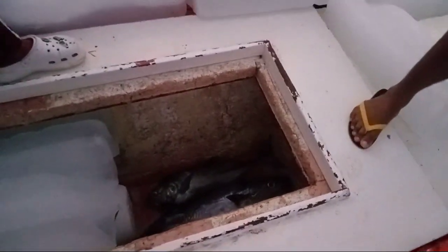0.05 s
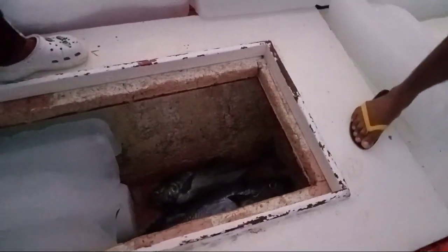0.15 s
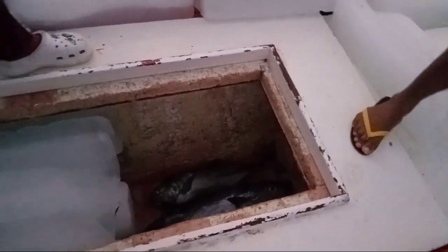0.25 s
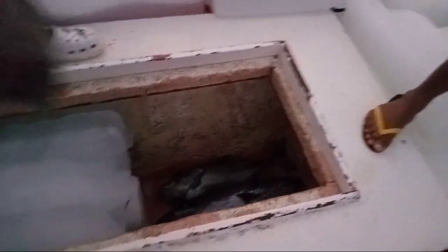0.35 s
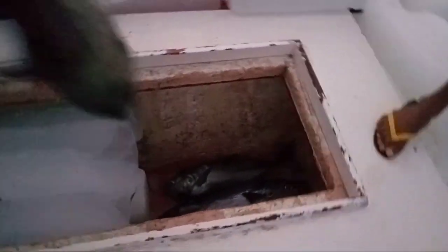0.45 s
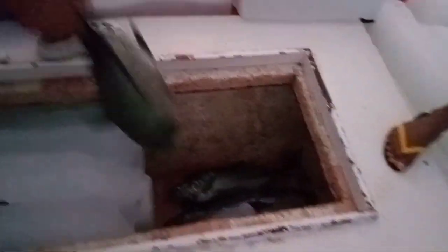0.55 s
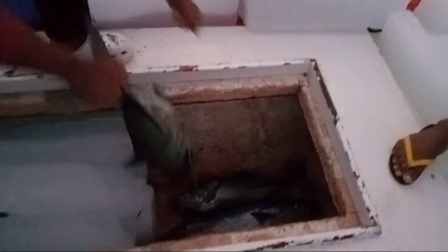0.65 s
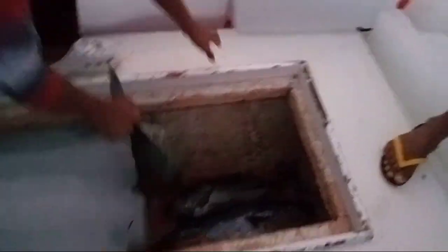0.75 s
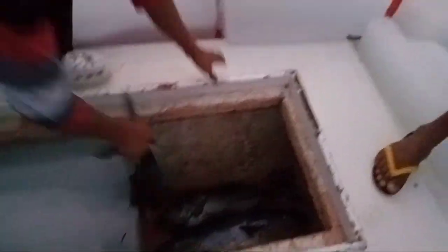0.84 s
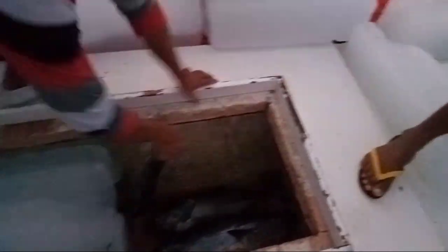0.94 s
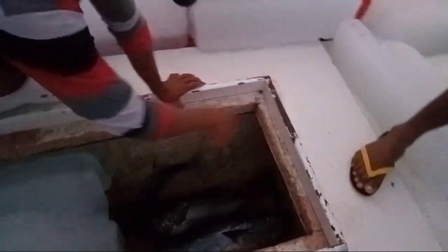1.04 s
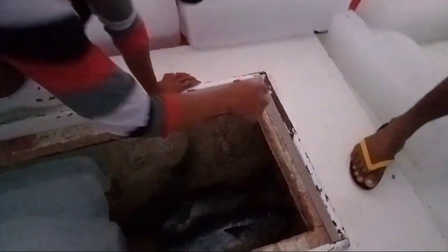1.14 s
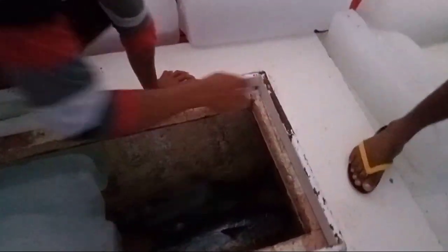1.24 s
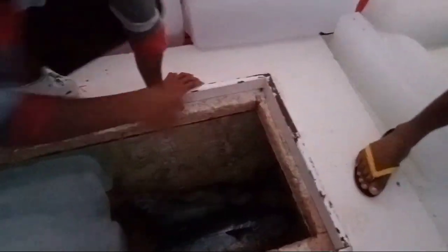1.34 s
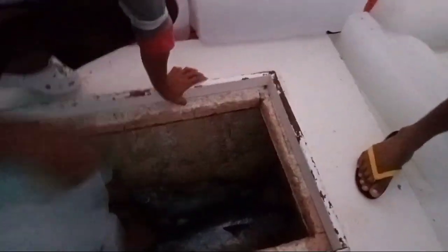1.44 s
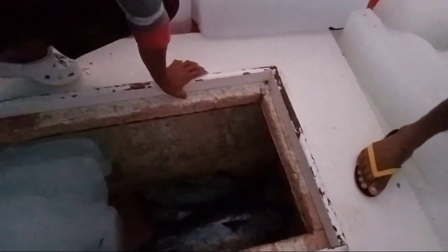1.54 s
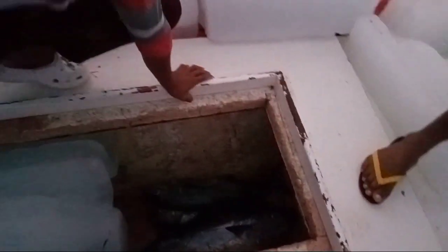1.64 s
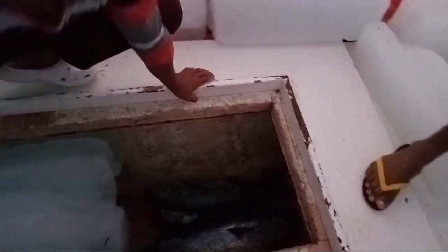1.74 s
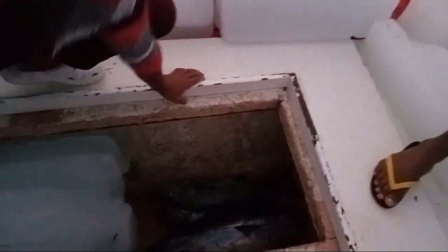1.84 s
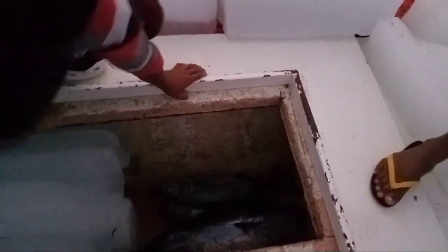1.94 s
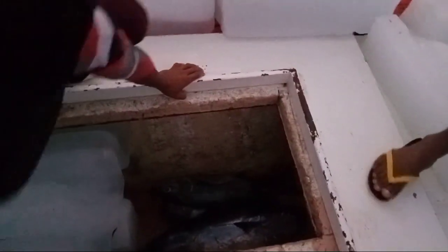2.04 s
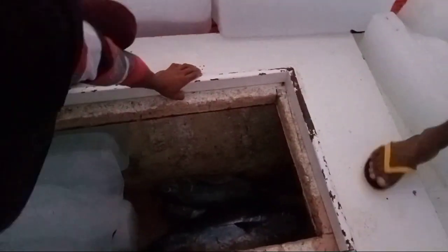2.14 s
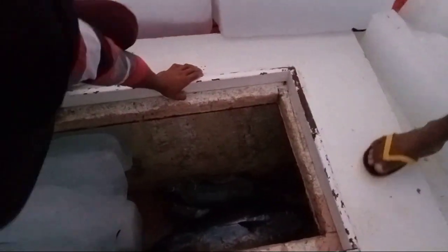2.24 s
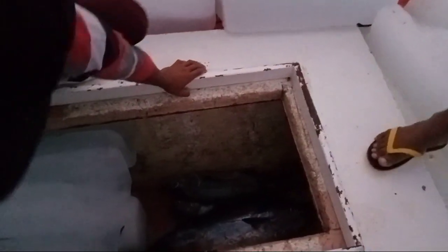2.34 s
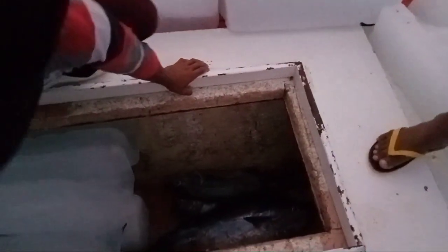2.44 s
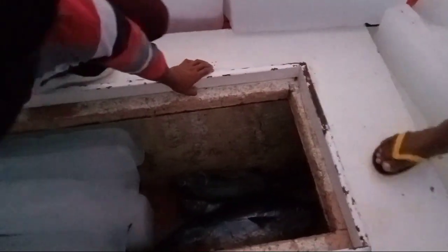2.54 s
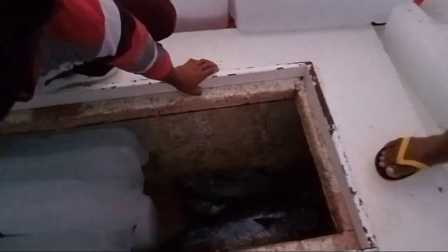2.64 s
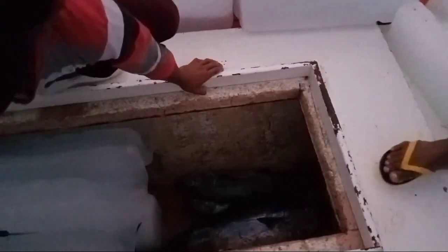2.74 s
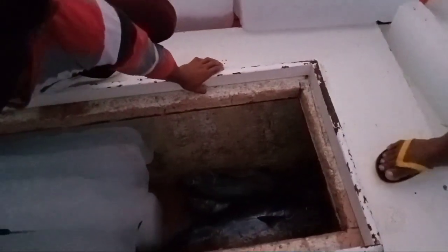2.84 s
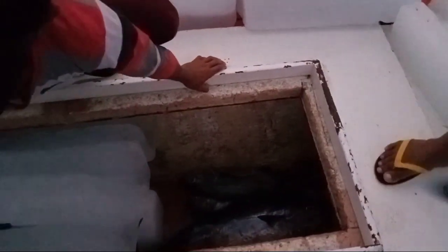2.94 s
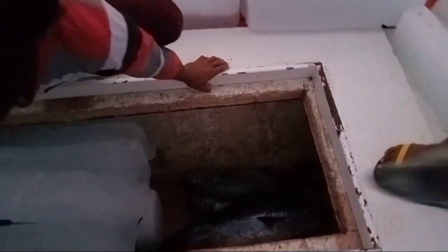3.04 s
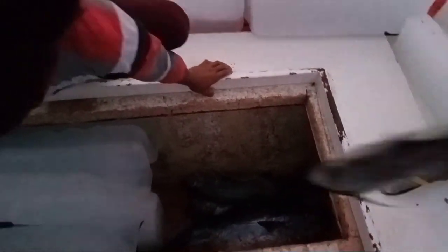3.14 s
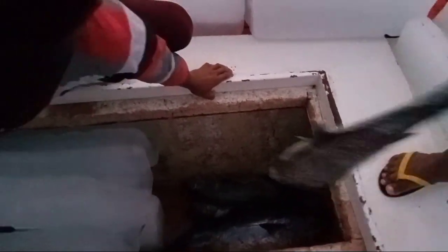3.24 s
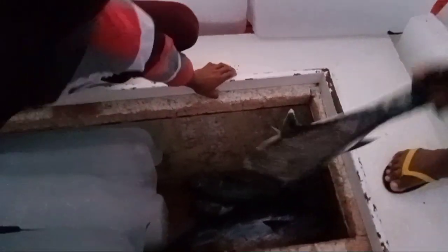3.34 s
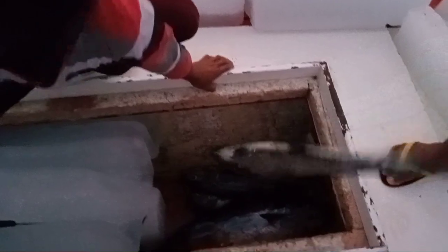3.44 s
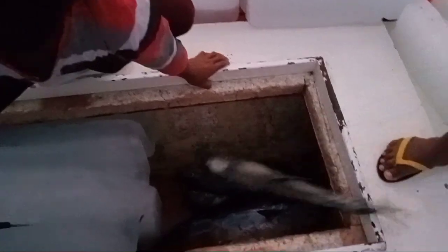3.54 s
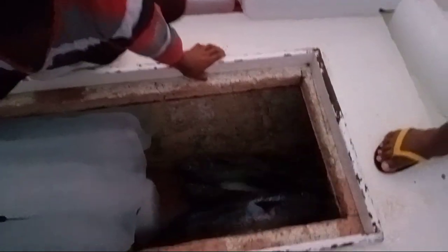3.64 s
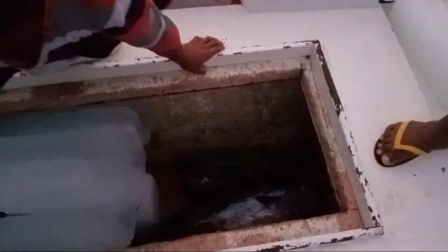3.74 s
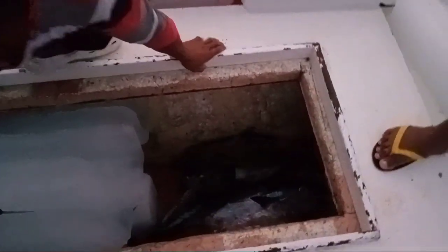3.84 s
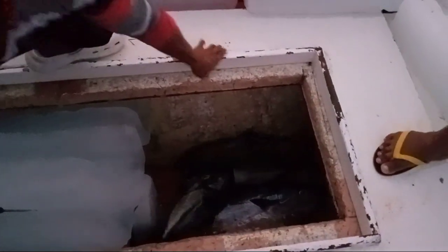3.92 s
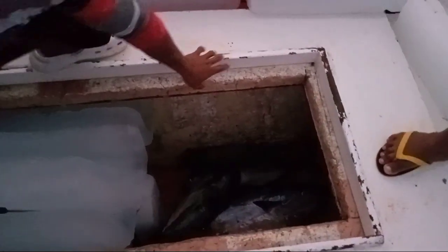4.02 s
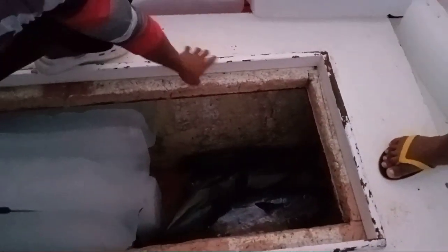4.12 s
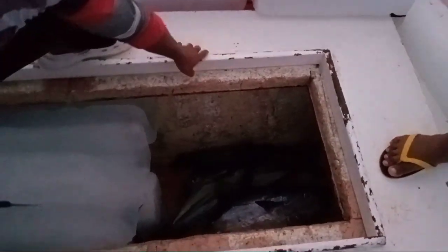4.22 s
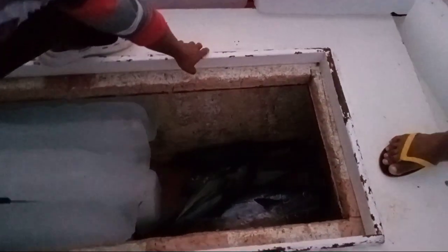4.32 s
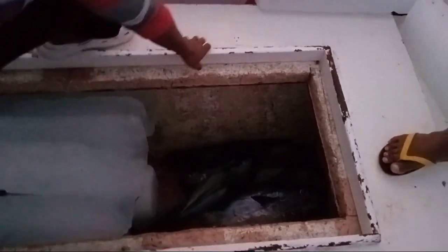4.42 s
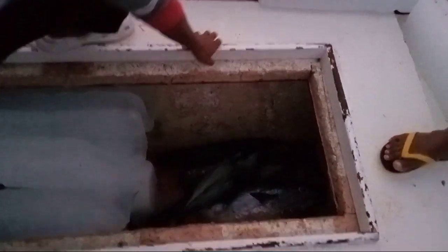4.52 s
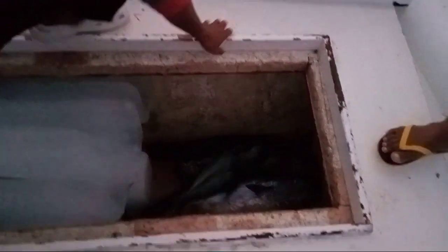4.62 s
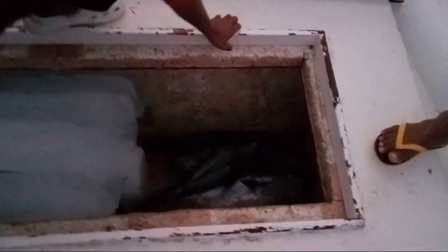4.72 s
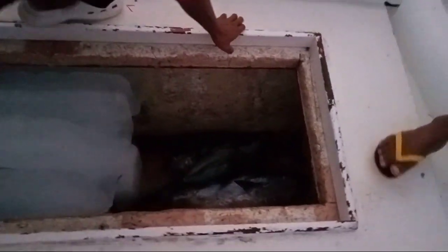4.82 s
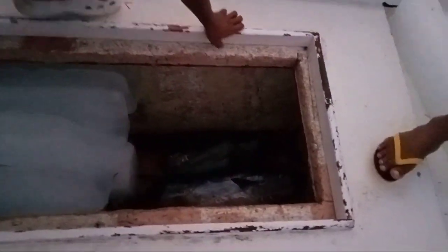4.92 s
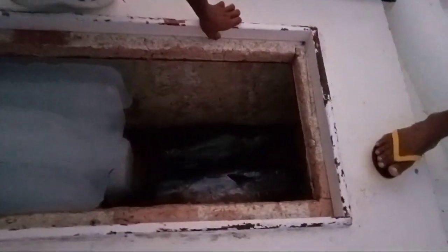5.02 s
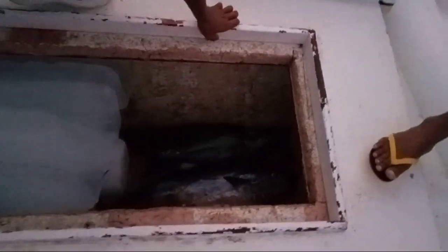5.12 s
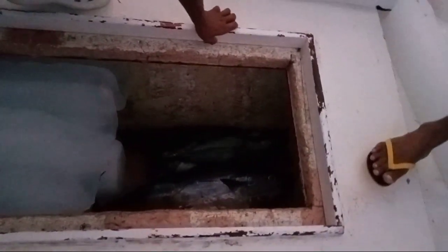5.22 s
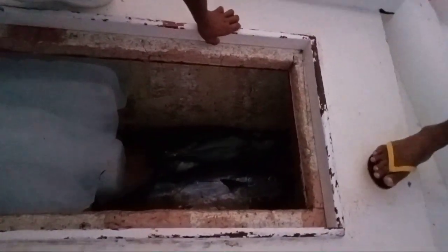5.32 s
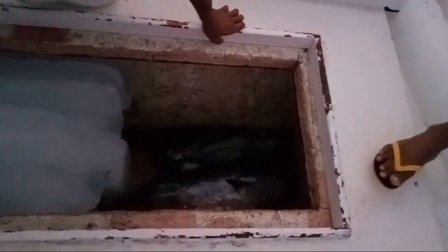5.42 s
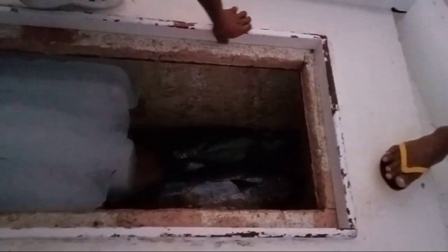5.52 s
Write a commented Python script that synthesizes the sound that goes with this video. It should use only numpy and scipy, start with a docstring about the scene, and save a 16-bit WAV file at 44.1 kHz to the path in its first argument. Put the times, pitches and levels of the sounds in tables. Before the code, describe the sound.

Foamy waves, bubbles and low gusty wind run throughout. Light wet pats lead to a sharp resonant smack on the hold wall near 1.2 seconds, with a quick skid squeak. A quieter middle has muffled bumps; around 3.6 seconds a heavier fish thumps onto other fish and slides. The handheld microphone is close outdoors, with only a short boxy reflection from the hold.

```python
"""On the deck of a small boat, two fish are dropped into a fibreglass ice hold.
The first slaps the wall and squeaks down it; the second thuds onto the catch and slithers over it.
Contacts are crackle, noise and ringing wall modes; thumps and squeaks are gliding sines; slithers are crackle.
Wind is shaped noise in gusts; water is flickering foam with bubbles, spray and gulps under the hull.
A faint, very high whistle arches up and down twice."""
import sys
import numpy as np
from scipy import signal
from scipy.fft import rfft, irfft
from scipy.io import wavfile
from scipy.ndimage import uniform_filter1d, map_coordinates

SR = 44100
rng = np.random.default_rng(int(sys.argv[2]) if len(sys.argv) > 2 else 0)


def wav_out(sig):
    """Save sig, one row per channel (or a flat mono array), as 16-bit PCM at SR to the path in sys.argv[1]."""
    wavfile.write(sys.argv[1], SR, np.round(np.clip(np.atleast_2d(sig).T, -1, 1) * 32767).astype(np.int16))


N = 245637  # length of the scene in samples


def undb(db):
    """Decibels to gain."""
    return 10 ** (np.asarray(db) / 20)


def unit(x):
    """Scale to an rms of one."""
    return x / np.sqrt(np.mean(x ** 2))


def add(track, s, sound):
    """Mix a sound into a track at time s."""
    start = max(int(s * SR), 0)
    track[start:start + len(sound)] += sound[:max(N - start, 0)]


def band(x, low_hz, high_hz, order=2):
    """Band-pass filter."""
    edges = [low_hz, min(high_hz, .45 * SR)]
    return signal.sosfilt(signal.butter(order, edges, "bandpass", fs=SR, output="sos"), x)


def low_pass(x, hz):
    """Low-pass filter without delay, so that subtracting it leaves the matching upper part."""
    return signal.sosfiltfilt(signal.butter(2, hz, fs=SR, output="sos"), x)


def colour(x, points, tilt_db=0, size=4096):
    """Causal filter with the given spectrum, tilted in dB per octave; the result has unit rms."""
    hz, db = np.transpose(points)
    octave = np.log2(np.maximum(np.arange(size // 2 + 1) * SR / size, 1))
    # the tilt acts between 256 and 4096 Hz and stays level outside
    shape_db = np.interp(octave, np.log2(hz), db) + tilt_db * np.clip(octave, 8, 12)
    # folding the cepstrum gives minimum phase
    cepstrum = irfft(np.log(undb(shape_db)))
    cepstrum[1:size // 2] *= 2
    cepstrum[size // 2 + 1:] = 0
    impulse = irfft(np.exp(rfft(cepstrum)))
    return unit(signal.fftconvolve(x, impulse)[:len(x)])


def walk(rate, size=N):
    """Random curve that heads for a new value rate times a second, with an rms of one."""
    steps = rng.standard_normal(size)
    return unit(map_coordinates(steps, [np.arange(size) * rate / SR], order=1))


def crackle(size, rate, spread_db):
    """Dense tiny clicks of unequal strength, rate of them a second on average."""
    chance = rng.random(size) < rate / SR
    strength = undb(spread_db * np.minimum(rng.exponential(size=size), 4))
    return chance * rng.choice([-1, 1], size) * strength


def blow(t, rise, t60):
    """Envelope of a soft contact: it builds up, then dies away."""
    rise = max(rise, 1 / SR)
    build_up = np.sin(np.minimum(t / rise, 1) * np.pi / 2) ** 2
    return build_up * np.exp(-np.log(1000) * np.maximum(t - rise, 0) / t60)


def swell(start, length, attack, t60):
    """Envelope over the whole scene: it rises, holds until the length is over, then dies away."""
    t = np.arange(N) / SR - start
    build_up = np.sin(np.clip(t / attack, 0, 1) * np.pi / 2) ** 2
    return build_up * np.exp(-np.log(1000) * np.maximum(t - length, 0) / t60)


def swells(events, attack, t60):
    """Joint envelope of (start, length, level) events; their powers add."""
    return np.sqrt(sum((undb(db) * swell(start, length, attack, t60)) ** 2 for start, length, db in events))


def bubbles(count=650, cycles=22, glide=0.24, spread_db=7.0):
    """Bubbles of all sizes ring briefly, rising in pitch as they reach the surface."""
    out = np.zeros(N)
    for when, size, strength, life in rng.random((count, 4)):
        hz = 450 * 8 ** size
        t60 = cycles * (.5 + life) / np.sqrt(hz * 700)
        t = np.arange(int(t60 * SR)) / SR
        phase = 2 * np.pi * hz * t * (1 + glide * t / t60 / 2)
        ring = blow(t, 0.0045, t60) * np.sin(phase)
        level_db = spread_db * min(-np.log(1 - strength), 2.5)
        add(out, when * N / SR, undb(level_db) * ring)
    return unit(out)


# Waves running along the hull. Each row: crest in seconds, level in dB, rise in seconds,
# drain t60 in seconds, tilt in dB that lifts the fine foam and lowers the coarse slosh.
WAVES = [(.03, -41.5, .1, 1.3, -0.5), (.29, -39, 0.3, 2.56, -2), (.56, -37, 0.16, 0.55, -1),
         (.98, -42.5, 0.54, 1.7, -2), (1.56, -44, 0.22, 1.07, 3.5), (1.78, -45, 0.2, 0.24, 5.5),
         (2.02, -46, 0.16, 3, -1), (2.5, -36.5, 0.33, 1.7, -4.5), (2.85, -49, 0.9, 2.4, 6.5),
         (4.12, -37, 0.43, 3.6, -1.5), (4.45, -49, 0.13, 1.1, -8), (4.72, -44, 0.046, 0.56, -2),
         (5.43, -39.5, 0.19, 0.27, 0.5), (5.56, -44, 0.025, .5, 3)]
# Spectrum of the water. Each row: frequency in Hz, density in dB per Hz.
WASH_COLOUR = [(100, -19), (350, -6.5), (700, -1), (1200, -4), (2000, -6.5), (3000, -8), (4200, -19),
               (5200, -25.5), (6500, -44), (9000, -72), (16000, -86)]
# Spectrum of fine spray and spitting droplets. Each row: frequency in Hz, density in dB per Hz.
SPRAY_COLOUR = [(3000, -39), (6500, -10.5), (8000, -6), (9500, 2), (11000, -5.5), (12500, -11), (14000, -8),
                (16000, -15.5)]
CALM_DB = -54.5  # lapping between the waves
SPRAY_DB, SPRAY_FOLLOWS = -33.5, 0.76  # spray over a froth of 0 dB, and the dB it gains per dB of froth


def wash(flicker_db=3.5, fizz_db=-2, bubble_db=-8.0):
    """Waves along the hull: bubbles in a rush of foam whose bands flicker, with fine spray on top."""
    foam = rng.standard_normal(N) + undb(fizz_db) * unit(crackle(N, rate=400, spread_db=3.5))
    edges = np.geomspace(150, 9600, 13)
    rush = np.zeros(N)
    for low, high in zip(edges, edges[1:]):
        # a random shift makes the bands independent
        rush += band(np.roll(foam, rng.integers(N)), low, high) * undb(flicker_db * walk(35))
    water = colour(rush, WASH_COLOUR) + undb(bubble_db) * colour(bubbles(), WASH_COLOUR, tilt_db=1.5)
    # fine foam sounds bright, a coarse slosh dark
    coarse = low_pass(water, 1600)
    slosh_power = froth_power = undb(CALM_DB) ** 2
    for crest, db, rise, drain, tilt_db in WAVES:
        flow = undb(db) * swell(crest - rise, rise, rise, drain)
        slosh_power = slosh_power + (flow / undb(tilt_db)) ** 2
        froth_power = froth_power + (flow * undb(tilt_db)) ** 2
    slosh, froth = np.sqrt(slosh_power), np.sqrt(froth_power)
    spray = colour(foam, SPRAY_COLOUR) * froth ** SPRAY_FOLLOWS * undb(SPRAY_DB + 3.3 * walk(57))
    return coarse * slosh + (water - coarse) * froth + spray


# Gusts on the microphone. Each row: start in seconds, length in seconds, level in dB,
# extra level in dB for the upper rumble.
GUSTS = [(0.087, 0.24, -30.5, -1.5), (0.445, .16, -38, 0.5), (0.625, 0.4, -33, -1.5),
         (1.024, 0.26, -26.5, -3.5), (1.375, 0.32, -33.5, -0.5), (1.665, 0.35, -29.5, -5.5),
         (2.067, 0.32, -35, 0), (2.752, .07, -33, -4), (2.888, 0.11, -27, -5), (3.057, 0.28, -32, -1.5),
         (3.494, 0.32, -30.5, 1.5), (3.754, 0.3, -27.5, 5), (4.177, 0.4, -29.5, 3), (4.644, 0.29, -34, 2.5),
         (4.985, 0.36, -33.5, 3), (5.258, 0.26, -31, 4)]
# Spectrum of the wind. Each row: frequency in Hz, density in dB per Hz.
WIND_COLOUR = [(20, -10), (33, -12), (50, -11), (70, -0.5), (110, 1), (150, -2), (220, -8.5), (300, -13.5),
               (420, -25.5), (800, -47), (2000, -65.5)]
GUST_ATTACK_S, GUST_T60_S = .02, .25
RUMBLE_SPLIT_HZ = 214


def wind(eddy_db=3.0, draught_db=-49):
    """Eddies buffet the microphone in gusts over a steady rumble; small eddies fill the upper rumble."""
    eddies = colour(rng.standard_normal(N), WIND_COLOUR)
    # even out the level over 40 ms, so that the gusts and a random flutter shape it
    eddies = eddies / np.sqrt(uniform_filter1d(eddies ** 2, SR // 25) + 1e-6)
    large = low_pass(eddies, RUMBLE_SPLIT_HZ)
    lower_gusts = [(s, length, db) for s, length, db, upper_db in GUSTS]
    upper_gusts = [(s, length, db + upper_db) for s, length, db, upper_db in GUSTS]
    lower = swells(lower_gusts, GUST_ATTACK_S, GUST_T60_S)
    upper = swells(upper_gusts, GUST_ATTACK_S, GUST_T60_S)
    gusts = (large * lower + (eddies - large) * upper) * undb(eddy_db * walk(35))
    return gusts + undb(draught_db) * colour(rng.standard_normal(N), WIND_COLOUR)


# Dull blows on the hold floor and the deck. Each row: start in seconds,
# pitch in Hz at the middle of its sinking glide, level in dB, t60 in seconds.
THUMPS = [(0.123, 115, -22, 0.051), (0.226, 163, -16, 0.017), (0.898, 112, -14.5, 0.12),
          (1.257, 156, -13.5, 0.02), (1.289, 125, -11, 0.022), (1.408, 125, -15.5, 0.023),
          (1.687, 106, -17, .05), (1.760, 150, -13, 0.019), (1.803, 170, -11, 0.011),
          (1.921, 148.3, -21.5, 0.17), (2.139, 136, -12.5, 0.016), (2.427, 117, -14.5, 0.02),
          (3.312, 244, -13.5, 0.075), (3.62, 298, -14.5, 0.092), (3.633, 132, -8.5, 0.12),
          (3.654, 140, -9.5, 0.15), (3.854, 300, -15, 0.02), (3.903, 183, -16, 0.066),
          (3.987, 145, -10, 0.093), (4.02, 324, -17.5, 0.13), (4.161, 175, -14.5, 0.023),
          (4.253, 139, -16.5, 0.035), (4.376, 178, -12.5, 0.025), (4.454, 175, -21, .033),
          (4.497, 130, -14, 0.062), (4.866, 169, -20.5, .05), (5.095, 184, -13.5, 0.0084),
          (5.185, 240, -18, 0.094), (5.282, 114, -18, 0.057), (5.323, 155, -16, 0.031)]


def thumps():
    """A soft weight pushes a panel, which swings and dies away, sinking in pitch as the load settles."""
    out, t = np.zeros(N), np.arange(SR // 4) / SR
    settling = 1 + .14 * (np.exp(-t / .015) - .5)
    for s, hz, db, t60 in THUMPS:
        swing = np.sin(2 * np.pi * np.cumsum(hz * settling) / SR)
        # the push builds up over one swing
        add(out, s, undb(db) * blow(t, 1 / hz, t60) * swing)
    return out


# Modes of the hold wall. Each row: frequency in Hz, level in dB, t60 in seconds.
WALL_MODES = [(333, -4, 0.17), (458, -2.5, 0.086), (536, -15.5, 0.3), (733, 7, 0.11), (859, 2.5, 0.08),
              (933, -8.5, 0.18), (1167, -1, 0.04), (1840, -1.5, 0.031), (1976, 6, 0.05), (2385, -10, 0.032),
              (3240, -33, 0.033)]


def wall_ring(t, rise):
    """The modes of the hold wall after one contact, each a decaying sine with a random phase."""
    ring = np.zeros(len(t))
    for hz, db, t60 in WALL_MODES:
        ring += undb(db) * blow(t, rise, t60) * np.sin(2 * np.pi * (hz * t + rng.random()))
    return ring


# Wet contacts of fish, hands and feet. Each row: start in seconds, level in dB, rise in seconds,
# t60 in seconds, brightness of the smack in dB per octave, pitch of the air pocket in Hz.
SLAPS = [(0.159, -36, 0.019, 0.21, 4.5, 3450), (0.384, -33, 0.014, 0.12, 2.5, 2920),
         (0.586, -33.5, 0.017, 0.057, 6, 3370), (.794, -33, 0.012, 0.061, 9, 3550),
         (1.081, -29.5, 0.0047, 0.083, -1, 2820), (1.184, -23, 0.0088, 0.061, 4.5, 470),
         (1.191, -12.5, 0.0056, .11, 1, 800), (1.222, -28, 0.0049, 0.41, -0.5, 2010),
         (1.388, -24.5, 0.0078, 0.057, 1, 2680), (1.413, -29, 0.0042, 0.073, 4, 3180),
         (1.482, -29, 0.012, 0.11, -1.5, 2020), (1.525, -35, 0.0022, 0.05, 4.5, 3130),
         (1.757, -34.5, 0.0024, 0.7, -5.5, 597), (1.811, -31, 0.0028, 0.057, -2, 2570),
         (1.933, -36, 0.0086, 0.08, 3.5, 610), (2.109, -30.5, 0.0035, 0.071, -8.5, 500),
         (2.265, -29.5, 0.0032, 0.014, 5, 3200), (3.083, -38.5, 0.0047, 0.042, 5, 3040),
         (3.13, -40, 0.0057, 0.34, -2, 1520), (3.304, -29.5, 0.0087, 0.28, -5, 1030),
         (3.472, -30.5, .012, 0.29, -1, 780), (3.499, -29, 0.011, 0.13, 1, 1450),
         (3.618, -12.5, 0.0067, 0.12, -6, 495), (3.641, -18, 0.0043, 0.19, -2.5, 410),
         (3.696, -28, 0.0089, 0.032, 3.5, 3640), (3.767, -25.5, 0.0047, 0.095, 3.5, 2710),
         (3.795, -22, 0.0021, 0.19, -9.5, 412), (3.845, -29.5, 0.017, .12, -3, 420),
         (3.891, -19, 0.0033, .11, -0.5, 1880), (3.909, -19.5, 0.0055, .06, -6, 477),
         (3.973, -22.5, 0.0076, 0.19, -2, 2470), (4.005, -18.5, 0.0081, 0.045, -6, 780),
         (4.017, -24.5, 0.0023, .06, -11, 2600), (4.082, -27, 0.0023, .05, -2, 423),
         (4.139, -35, .007, .06, 2, 3600), (4.331, -26.5, 0.0031, 0.14, -7.5, 880),
         (4.411, -38, 0.0014, .1, 1, 1920), (4.510, -29, 0.0025, 0.26, -9, 1640),
         (4.613, -36, 0.0043, 0.059, 0.5, 1700), (4.682, -30.5, 0.0033, 0.2, -5, 2290),
         (5.101, -26.5, 0.0043, 0.052, 4, 1250), (5.115, -21.5, 0.0019, 0.12, -2.5, 668),
         (5.169, -26.5, 0.0026, 0.13, -3, 1370), (5.429, -34, 0.022, 0.06, -0.5, 590)]
# Spectrum of a smack before its brightness. Each row: frequency in Hz, density in dB per Hz.
SLAP_COLOUR = [(60, -26.5), (200, -8), (350, -3), (800, -7), (1400, -5), (2000, -6.5), (3000, -10.5),
               (4500, -20.5), (6500, -42.5), (9500, -28), (12000, -40), (16000, -61)]
WALL_RING_DB = -19.5  # gain of the wall modes under any contact, relative to that contact


def slaps(pocket_db=-3, pocket_width=0.29, spit_db=-26, spit_per_bright=3.04, patchy_db=2):
    """Wet skin lands in many tiny smacks: trapped air squelches, droplets spit, and the hold wall rings."""
    out, t = np.zeros(N), np.arange(SR // 4) / SR
    widen = 1 + pocket_width / 2
    for s, db, rise, t60, bright_db, pocket_hz in SLAPS:
        contact = blow(t, rise, t60)
        patches = contact * undb(patchy_db * walk(182, size=len(t)))
        smack = colour(crackle(len(t), rate=12000, spread_db=2), SLAP_COLOUR, bright_db)
        pocket = band(rng.standard_normal(len(t)), pocket_hz / widen, pocket_hz * widen)
        spit = colour(crackle(len(t), rate=2600, spread_db=5.5), SPRAY_COLOUR)
        # a brighter, wetter contact throws more droplets
        spit_gain = undb(spit_db + spit_per_bright * min(bright_db, 6))
        wet = unit(smack * patches) + undb(pocket_db) * unit(pocket * patches) + spit_gain * unit(spit * patches)
        # the wet parts share the energy of the contact
        wet = unit(wet) * np.sqrt(np.mean(contact ** 2))
        add(out, s, undb(db) * (wet + undb(WALL_RING_DB) * wall_ring(t, rise)))
    return out


# Faint, very high whistles. Each row: start in seconds, length in seconds, level in dB.
WHISTLES = [(.2, .4, -66), (4.98, .38, -63)]
WHISTLE_END_HZ, WHISTLE_TOP_HZ = 11800, 13900  # centre of the wobbling pitch at either end and at the top


def whistles(wobble=.05):
    """A thin whistle rises, levels off and sinks again; random pitch and level make it airy."""
    out = np.zeros(N)
    for s, length, db in WHISTLES:
        arch = np.sin(np.linspace(0, np.pi, int(length * SR))) ** 2
        hz = WHISTLE_TOP_HZ - (WHISTLE_TOP_HZ - WHISTLE_END_HZ) * (1 - arch) ** 4
        phase = 2 * np.pi * np.cumsum(hz * (1 + wobble * walk(1500, size=len(hz)))) / SR
        add(out, s, undb(db) * np.sqrt(arch) * walk(700, size=len(hz)) * np.sin(phase))
    return out


# Water gulping under the hull. Each row: start in seconds, length in seconds,
# first pitch in Hz, last pitch in Hz, level in dB.
GULPS = [(0.251, 0.084, 540, 920, -33), (0.483, 0.1, 646, 489, -37.5), (.864, 0.036, 464, 314, -32.5),
         (2.358, .06, 1004, 1400, -36), (2.381, 0.078, 311, 481, -28), (4.135, 0.028, 360, 276, -26),
         (4.377, 0.065, 290.5, 722, -30.5), (5.292, 0.06, 366, 800, -40)]


def gulps():
    """Churning water stirs air pockets under the hull; each glides as the water closes on it."""
    out = np.zeros(N)
    for s, length, first_hz, last_hz, db in GULPS:
        size = int(length * SR)
        phase = 2 * np.pi * np.cumsum(np.geomspace(first_hz, last_hz, size)) / SR
        # two random curves spread the tone into a narrow gliding noise
        churn = walk(220, size=size) * np.sin(phase) + walk(220, size=size) * np.cos(phase)
        add(out, s, undb(db) * np.sin(np.linspace(0, np.pi, size)) * churn)
    return out


# Wet skin skidding on the smooth wall, one list of points a skid.
# Each row: time in seconds, centre pitch in Hz, level in dB before the common gain and the partials.
SKIDS = [
    [(0.8, 4100, -44), (0.808, 3750, -44), (0.818, 3840, -32), (0.826, 3930, -51)],
    [(1.287, 3050, -29), (1.291, 2970, -26.5), (1.311, 2407, -25.5), (1.321, 1980, -23), (1.331, 1826, -24),
     (1.337, 1917, -21), (1.345, 2067, -34), (1.357, 1840, -33), (1.366, 1815, -42)],
]
# Partials of a squeak, from the fundamental up. Each entry: gain in dB.
SQUEAK_PARTIALS = [5, -18.5, -36, -36, -43]


def skids(skid_db=0.4, flutter_db=3.0, wobble=.032, rough=0.16):
    """Fast stick-slip gives an unsteady gliding squeak with weak overtones."""
    out = np.zeros(N)
    for skid in SKIDS:
        s, hz, db = np.transpose(skid)
        t = np.arange(s[0], s[-1], 1 / SR)
        pitch = np.interp(t, s, hz) * (1 + wobble * walk(957, size=len(t)))
        phase = 2 * np.pi * np.cumsum(pitch) / SR
        grip = undb(np.interp(t, s, db) + skid_db + flutter_db * walk(267, size=len(t)))
        grip = grip * (1 + rough * walk(2200, size=len(t)))
        squeak = sum(undb(part_db) * np.sin(k * phase) for k, part_db in enumerate(SQUEAK_PARTIALS, 1))
        add(out, s[0], grip * squeak)
    return out


# Square knocks on the hold wall. Each row: start in seconds, gain of the wall modes in dB.
KNOCKS = [(1.191, -16.5), (3.308, -43.5), (3.618, -38), (5.112, -40)]
KNOCK_RISE_S = 0.0062


def knocks():
    """A square hit sets the hold wall ringing."""
    out, t = np.zeros(N), np.arange(SR // 4) / SR
    for s, db in KNOCKS:
        add(out, s, undb(db) * wall_ring(t, KNOCK_RISE_S))
    return out


# Fish sliding down the wall and over the catch. Each row: start in seconds, length in seconds, level in dB.
SLIDES = [(1.225, 0.21, -38), (3.485, 0.092, -40.5), (3.65, 0.1, -41), (3.77, 0.23, -34.5),
          (3.82, 0.062, -28)]
# Spectrum of the rasp. Each row: frequency in Hz, density in dB per Hz.
SLITHER_COLOUR = [(100, -4), (400, 9), (800, 2), (1500, -4), (2800, -5.5), (4500, -14), (6500, -31),
                  (9500, -30), (12000, -68), (16000, -48)]
SLIDE_ATTACK_S, SLIDE_T60_S = .03, .15


def slither(jerk_db=4, squish_db=-20.5, squish_patchy_db=5):
    """Scales and fins rasp over wet surfaces in small jerks, squeezing out patches of fine crackle."""
    rasp = colour(crackle(N, rate=2500, spread_db=2.0), SLITHER_COLOUR)
    squish = colour(crackle(N, rate=1200, spread_db=-1.5), SPRAY_COLOUR)
    squish = squish * undb(squish_db + squish_patchy_db * walk(60))
    return (rasp + squish) * swells(SLIDES, SLIDE_ATTACK_S, SLIDE_T60_S) * undb(jerk_db * walk(90))


def hold(x, t60=0.07, echo_db=-15):
    """The small box adds a short tail of close reflections, made of decaying noise."""
    t = np.arange(SR // 3) / SR
    tail = band(rng.standard_normal(len(t)), 300, 9000, order=1) * blow(t, .006, t60)
    tail = tail / np.sqrt(np.sum(tail ** 2))
    return x + undb(echo_db) * signal.fftconvolve(x, tail)[:N]


def scene():
    """The fish in the hold, with sea and wind around the boat."""
    in_hold = hold(thumps() + slaps() + knocks() + slither())
    return (wash() + wind() + in_hold + whistles() + gulps() + skids())[None]


PEAK_CEILING = .88  # full scale is 1
TOP_HZ = 15550


def record(dry, low_cut_hz=48):
    """The microphone loses the deepest bass and rounds the loudest peaks; the recorder cuts off the top."""
    thinned = signal.sosfilt(signal.butter(2, low_cut_hz, "highpass", fs=SR, output="sos"), dry)
    rounded = thinned / (1 + (thinned / PEAK_CEILING) ** 8) ** (1 / 8)
    return signal.sosfilt(signal.ellip(10, .2, 80, TOP_HZ, fs=SR, output="sos"), rounded)


dry = scene()
out = record(dry)
wav_out(out)
```